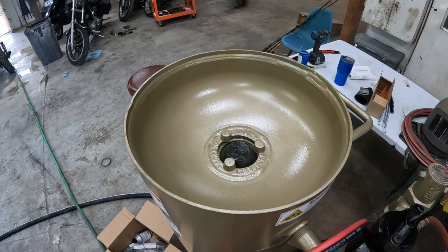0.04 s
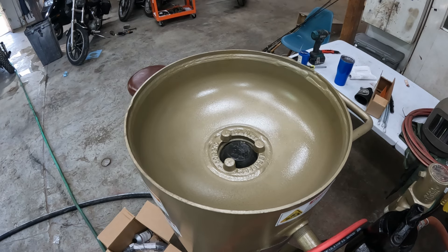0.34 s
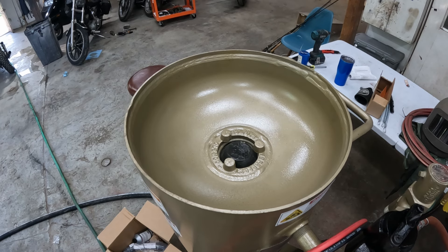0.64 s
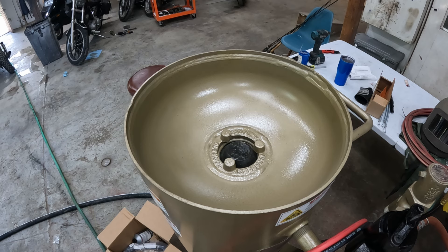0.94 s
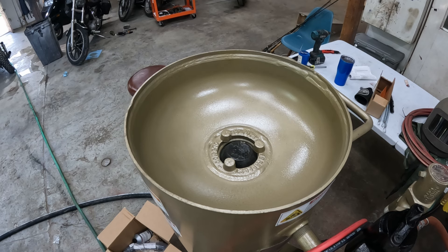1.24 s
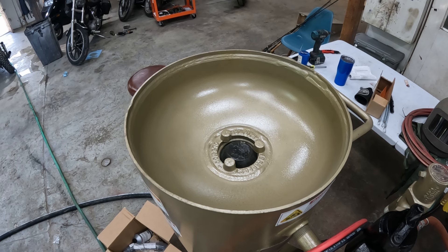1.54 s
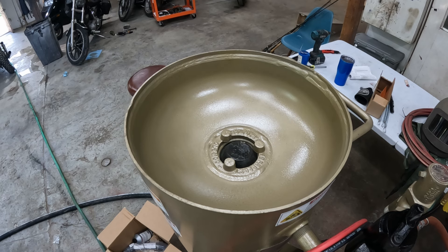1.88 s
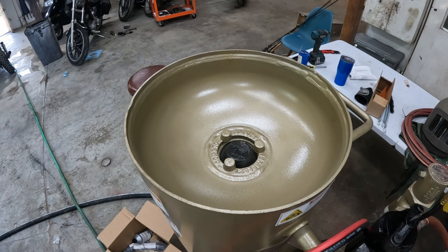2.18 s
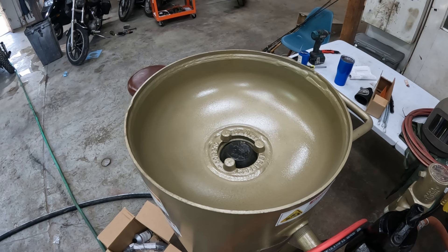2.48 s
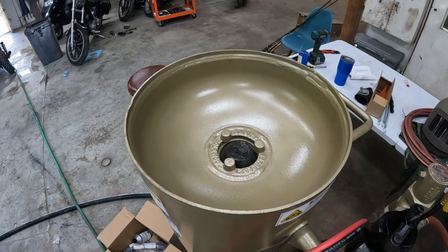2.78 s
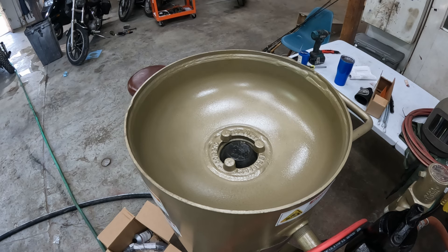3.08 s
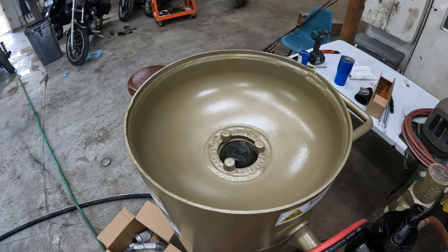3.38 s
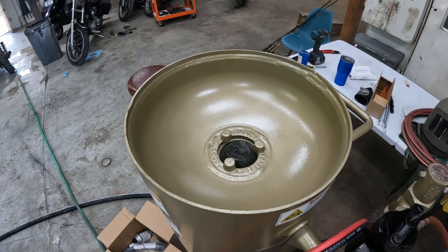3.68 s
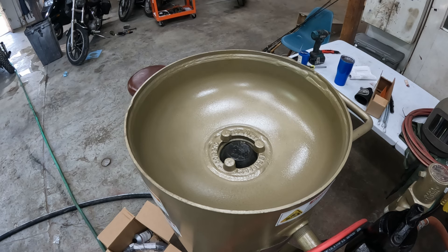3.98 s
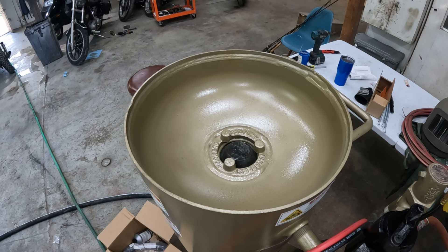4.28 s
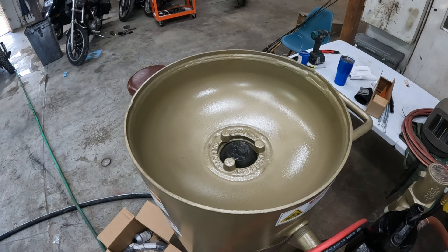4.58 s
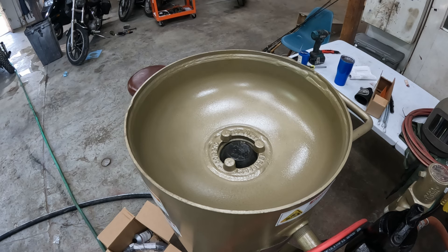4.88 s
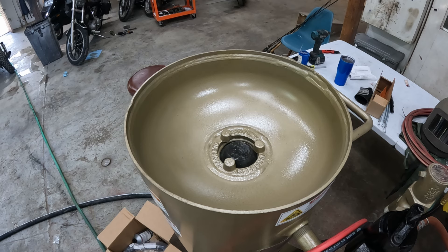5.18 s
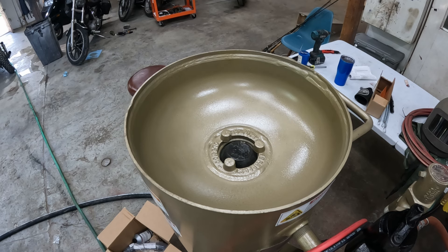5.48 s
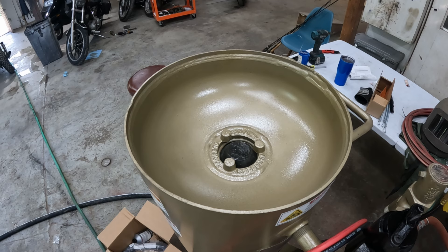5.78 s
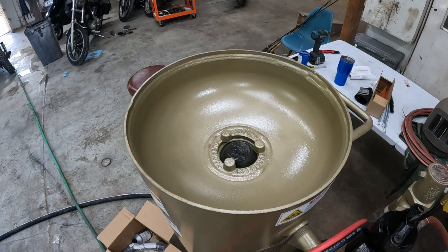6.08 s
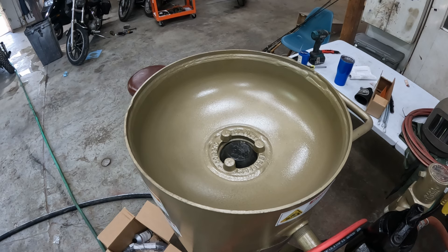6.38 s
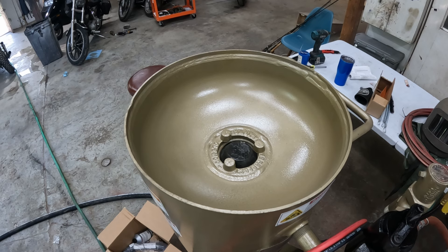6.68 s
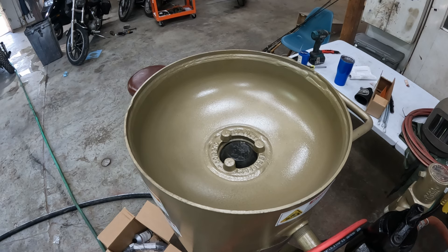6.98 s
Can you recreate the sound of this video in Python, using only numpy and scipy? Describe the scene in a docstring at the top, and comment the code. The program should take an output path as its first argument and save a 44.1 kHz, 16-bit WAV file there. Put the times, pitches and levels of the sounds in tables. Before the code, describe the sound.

A close, steady hiss of air filling a metal tank in a work area. It swells and sharpens as the valve passes more flow, while a high whistle catches on and off, creeping slightly up in pitch. Behind it sit a low rumble and a barely audible hum. In the last moment, air bursts from the tank's top opening, adding a deeper rushing roar and wind rumble on the microphone just above.

```python
"""Compressed air filling a blast pot

Air streams through a valve and hose into a steel pot, heard from just above its dished top.
The turbulent jet hisses and brightens in steps with the flow; passages resonate and fall silent,
and a rising edge tone whistles in spurts. Slow eddies roar and buffet the microphone over a faint hum.
Near the end air gushes out of the filler opening with a low roar."""
import sys
import numpy as np
from scipy import signal
from scipy.fft import rfft, irfft
from scipy.io import wavfile
from scipy.ndimage import map_coordinates

SR = 44100
rng = np.random.default_rng(int(sys.argv[2]) if len(sys.argv) > 2 else 0)


def generate_wav(sig):
    """Save sig (samples, or channels by samples) to the path in sys.argv[1] as 16-bit PCM at SR."""
    pcm = np.round(np.clip(np.atleast_2d(sig).T, -1, 1) * 32767).astype(np.int16)
    wavfile.write(sys.argv[1], SR, pcm)


N = 310313
TIME = np.arange(N) / SR
GUSH_S = 6.35  # air breaks out of the filler opening


def jet(pivot_hz=4500, knee_hz=2500, low_hz=520, frame=1024):
    """Turbulent mixing noise: a faster jet sheds smaller eddies, so its hiss grows louder and brighter."""
    # base spectrum of the hiss: f/Hz, level/dB
    hiss_spectrum = [(350, -62), (750, -65.5), (1100, -64), (1580, -63.5), (1900, -57), (2600, -59.5),
                     (3300, -58.5), (4400, -57.5), (5600, -58), (7000, -58.5), (8500, -61.5), (10500, -67),
                     (13000, -74.5), (15500, -78.5)]
    hz, s, eddies = signal.stft(rng.standard_normal(N), SR, nperseg=frame)
    hz = hz[:, None]
    octaves = np.log2(np.maximum(hz, knee_hz) / pivot_hz)
    tilt_db = with_flow(s, -.5, 1.24) * octaves
    db = spectrum_db(hiss_spectrum, hz) + with_flow(s, -0.73, 1.0) + tilt_db
    db += passages_db(hz, s) + rings_db(hz, s) + hollows_db(hz, s)
    # the many weaker modes of hose and pot come and go at random
    db += 1.3 * ripple(hz, s, width_hz=130, hold_s=0.5)
    # the treble flickers slightly
    db += 0.64 * np.minimum(hz / 9000, 1) * ripple(hz, s, width_hz=2430, hold_s=.04)
    # a small jet radiates little bass
    bass_cut = hz ** 2 / np.hypot(hz ** 2, low_hz ** 2)
    gain = undb(db) * np.sqrt(SR / 2) * bass_cut
    return signal.istft(eddies * gain, SR, nperseg=frame)[1][:N]


def with_flow(at, weak, full, settle_s=0.35):
    """Throttling: the valve passes air in steps, moving a quantity between its weak and full values."""
    # steps of the flow: onset t/s, flow (0 weak, 1 full)
    flow_steps = [(0, 0), (1.58, 0.38), (2.5, 0.56), (3.7, 0.87), (5.15, 0.75), (5.88, 0.77), (6.25, .98),
                  (6.8, 0.68)]
    starts, flows = np.transpose(flow_steps)
    changes = zip(starts[1:], np.diff(flows))
    flow = flows[0] + sum(change * gate(at, start, np.inf, settle_s) for start, change in changes)
    return weak + (full - weak) * flow


def passages_db(hz, s):
    """Duct resonance: broad modes of valve and hose colour the hiss as the flow favours or starves them."""
    # the valve's own constant treble modes: f/Hz, width/Hz, gain/dB
    valve_modes = [(12500, 1000, 1.8), (13900, 600, 1.3), (15600, 900, 2)]
    # modes of the passages: f/Hz, width/Hz, gain at weak flow/dB, gain at full flow/dB
    passage_modes = [(1350, 450, 1.2, -0.8), (2700, 970, 2.5, -2), (3350, 650, 3, -0.5),
                     (4220, 1100, 4, -2), (5530, 1000, 2, 0.7), (6160, 540, -.8, 2.3), (12500, 800, 0.5, 3),
                     (14400, 2200, -1.2, 3.5)]
    db = sum(peak_db * bump(hz, centre, width) for centre, width, peak_db in valve_modes)
    for centre, width, weak_db, full_db in passage_modes:
        db = db + with_flow(s, weak_db, full_db) * bump(hz, centre, width)
    return db


def rings_db(hz, s, rise_per_s=0.12, sag_per_s=0.077, turn_s=2.62, flank_share=0.22):
    """Transient resonance: a passage catches, glides and lets go, thinning the hiss on either side."""
    # spells of ringing: start t/s, end t/s, mid-spell f/Hz, gain/dB
    rings = [(.8, 1.55, 4800, 1.5), (1.8, 2.7, 2800, 3), (1.55, 2.1, 3500, 2.5), (1.82, 2.18, 4430, 2),
             (2.6, 3.2, 540, 4.5), (2.7, 3, 2060, 4), (2.48, 2.8, 6500, 2.2), (2.9, 3.6, 2880, 5.5),
             (3.7, 6.4, 5900, 1.5), (4.45, 5.4, 2000, 3.5), (4.4, 5.6, 4450, 4), (4.3, 5.7, 5300, 3),
             (5.1, 6.1, 6870, 2.5), (5.6, 6.3, 2630, 6), (6.89, 7.2, 2930, 9)]
    db = 0
    for start, end, ring_hz, peak_db in rings:
        middle = (start + end) / 2
        glide = rise_per_s if middle < turn_s else -sag_per_s  # early rings rise, later ones sag
        centre = ring_hz * (1 + glide * (s - middle))
        width = 440 * np.sqrt(ring_hz / 3000)  # higher rings are wider
        flanks = bump(hz, centre - width, width) + bump(hz, centre + width, width)
        shape = bump(hz, centre, width) - flank_share * flanks
        db += peak_db * gate(s, start, end, fade_s=.15) * shape
    return db


def hollows_db(hz, s):
    """Band attenuation: the hiss goes hollow for a moment where a shallow notch opens."""
    # notches: start t/s, end t/s, f/Hz, width/Hz, gain/dB
    hollows = [(1.55, 2.4, 6250, 900, -3), (3.03, 3.548, 6200, 1300, -3), (5, 5.973, 10800, 1900, -4),
               (5.1, 6.2, 1300, 360, -3)]
    return sum(dip_db * gate(s, start, end, fade_s=.15) * bump(hz, centre, width)
               for start, end, centre, width, dip_db in hollows)


def whistle(waver_hz=9, fade_s=0.085, idle_db=-44, third_db=-9):
    """Edge tone: the jet at the valve locks into oscillation in spurts, with a faint airy band between."""
    # pitch, climbing with the pressure until the gush: t/s, f/Hz
    pitch = [(0, 3260), (.85, 3372), (1.8, 3480), (3.85, 3664), (4.39, 3682), (4.7, 3735), (5.05, 3745),
             (6.3, 3880), (6.85, 3735)]
    # spurts of locked oscillation: start t/s, end t/s, level/dB
    spurts = [(-.1, .12, -33.5), (.78, .93, -31), (1.7, 1.95, -34), (2.16, 2.38, -33.5), (2.6, 2.86, -33),
              (3.07, 3.33, -29.5), (3.33, 3.54, -34), (3.8, 4.41, -28.7), (4.41, 4.65, -34),
              (4.65, 5.06, -29.7), (5.77, 5.92, -35), (6.75, 6.99, -28.5)]
    hz = np.interp(TIME, *np.transpose(pitch)) + waver_hz * walk(16.45)
    locked = sum(undb(db) * gate(TIME, start, end, fade_s) for start, end, db in spurts)
    core = locked * tone(hz, steady=.66, line_hz=200)
    airy_band = undb(idle_db) * tone(hz, steady=0, line_hz=170)
    octave = tone(2 * hz, steady=0, line_hz=190)
    third = undb(third_db) * tone(3 * hz, steady=0, line_hz=260)
    # the hoarse overtones grow with the flow and break off at the gush
    overtone_gain = undb(with_flow(TIME, -41, -30)) * gate(TIME, -np.inf, GUSH_S, fade_s)
    return core + airy_band + overtone_gain * (octave + third)


def gush(rise_s=0.039, onset_db=-28.5, ease_db_per_s=3, churn_db=1.1, rim_db=-25):
    """Orifice noise: air leaves the filler opening with a churning roar that eases and a hiss at the rim."""
    # spectrum of the deep body: f/Hz, relative level/dB
    body_spectrum = [(50, -10), (120, -2.5), (200, 2), (300, -1), (450, -2.5), (680, -8), (950, -1),
                     (1300, 0), (1800, -3.5), (2400, -28)]
    # spectrum of the hiss at the rim: f/Hz, relative level/dB
    rim_spectrum = [(2400, -22), (3500, -0.5), (4700, 2), (6000, -1), (7500, -14), (9300, -8), (11000, -13),
                    (13000, -30)]
    body = coloured_noise(body_spectrum)
    rim = coloured_noise(rim_spectrum)
    age = np.maximum(TIME - GUSH_S, 0)
    body_db = onset_db - ease_db_per_s * age + churn_db * walk(9.9)
    opening = gate(TIME, GUSH_S, np.inf, rise_s)
    return opening * (undb(body_db) * body + undb(rim_db) * rim)


def outflow():
    """Large-scale turbulence: slow eddies above the pot make a hollow roar and buffet the microphone."""
    # spectrum of the roar: f/Hz, relative level/dB
    roar_spectrum = [(50, -28), (95, -4), (130, -0.5), (190, 3.5), (300, 1.5), (420, -0.5), (540, -5),
                     (720, -4), (1200, -31.5)]
    # spectrum of the buffeting: f/Hz, relative level/dB
    buffet_spectrum = [(10, -10), (25, 2.5), (55, 1.5), (90, 3.5), (140, 2), (400, -44)]
    # gusts that reach the microphone: start t/s, end t/s, gain of the buffeting/dB
    gusts = [(4.6, 4.85, 6), (5.898, 6.05, 7), (6.35, 7.2, 8)]
    gust_db = sum(db * gate(TIME, start, end, fade_s=.12) for start, end, db in gusts)
    roar = undb(with_flow(TIME, -44, -38.5)) * coloured_noise(roar_spectrum)
    buffet = undb(with_flow(TIME, -56, -48) + gust_db) * coloured_noise(buffet_spectrum)
    return roar + buffet


def hum(hz=58, level_db=-58):
    """Narrow-band background: a faint, slightly unsteady hum in the workshop."""
    return undb(level_db) * tone(np.full(N, hz), steady=.6, line_hz=10)


def tone(hz, steady, line_hz):
    """Line broadening: a tone of rms 1, its power part steady, part spread over a band line_hz wide."""
    shake = (walk(line_hz / 2) + 1j * walk(line_hz / 2)) / np.sqrt(2)
    envelope = np.sqrt(steady) + np.sqrt(1 - steady) * shake
    carrier = np.exp(2j * np.pi * np.cumsum(hz) / SR)
    return np.sqrt(2) * np.real(envelope * carrier)


def shaped_noise(gain):
    """Spectral shaping: white noise weighted by gain(f), scaled to rms 1."""
    white = rfft(rng.standard_normal(N))
    noise = irfft(white * gain(np.fft.rfftfreq(N, 1 / SR)), N)
    return noise / noise.std()


def coloured_noise(spectrum):
    """Filtered noise of rms 1 that follows a tabulated spectrum."""
    return shaped_noise(lambda f: undb(spectrum_db(spectrum, f)))


def walk(rate_hz):
    """Low-pass noise: a smooth random fluctuation of spread 1."""
    return shaped_noise(lambda f: 1 / (1 + (f / rate_hz) ** 4))


def ripple(hz, s, width_hz, hold_s):
    """Spectral ripple: random peaks and dips that form and dissolve, of spread near 1."""
    grid = rng.standard_normal((256, 256))
    return map_coordinates(grid, np.broadcast_arrays(hz / width_hz, s / hold_s), order=3, mode="wrap")


def bump(hz, centre_hz, width_hz):
    """A resonance peak as a Gaussian bell, one at its centre."""
    return np.exp(-(2 * (hz - centre_hz) / width_hz) ** 2)


def spectrum_db(points, hz):
    """A spectral envelope joined by straight lines on a log-frequency axis."""
    f, db = np.transpose(points)
    return np.interp(np.log(np.maximum(hz, 1)), np.log(f), db)


def gate(at, start, end, fade_s):
    """A trapezoidal envelope: one between start and end, with sloping sides."""
    return np.clip(np.minimum(at - start, end - at) / fade_s + .5, 0, 1)


def undb(db):
    """Decibels to amplitude ratio."""
    return 10 ** (np.asarray(db) / 20)


def scene():
    """Superposition: all sources add at one microphone, the same in both channels."""
    air = jet() + whistle() + outflow() + gush() + hum()
    return np.array([air, air])


def record(dry, top_hz=15900):
    """Saturation and band limiting: the overloaded microphone flattens peaks; the recorder cuts the top."""
    ceiling = with_flow(TIME, 0.37, 0.31)  # share of full scale
    flattened = dry / (1 + (dry / ceiling) ** 8) ** (1 / 8)
    lowpass = signal.firwin(255, top_hz, window="blackman", fs=SR)
    return signal.fftconvolve(flattened, lowpass[None], mode="same", axes=1)


dry = scene()
out = record(dry)
generate_wav(out)
```